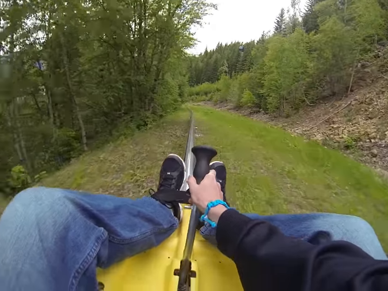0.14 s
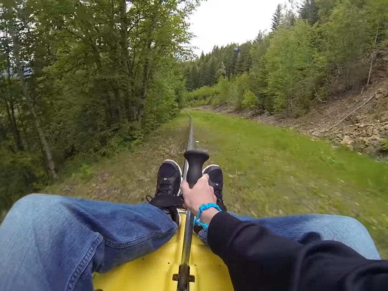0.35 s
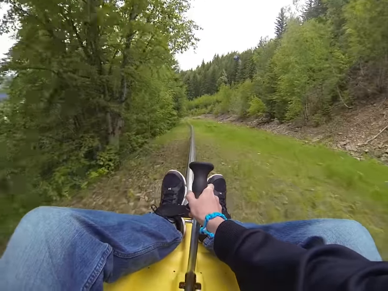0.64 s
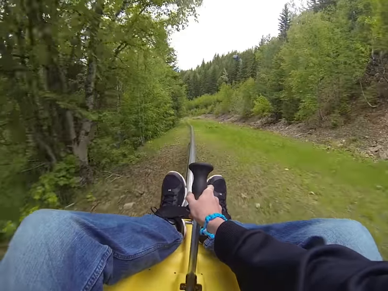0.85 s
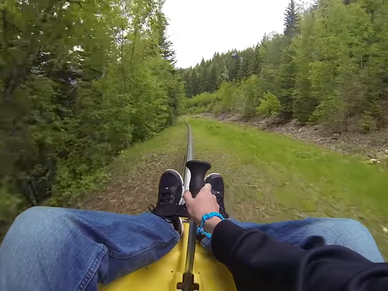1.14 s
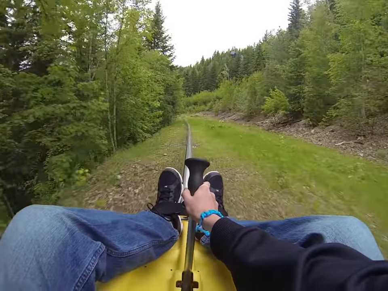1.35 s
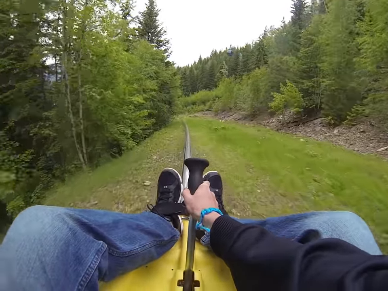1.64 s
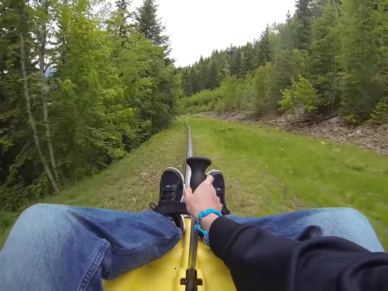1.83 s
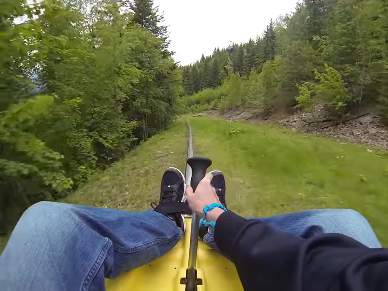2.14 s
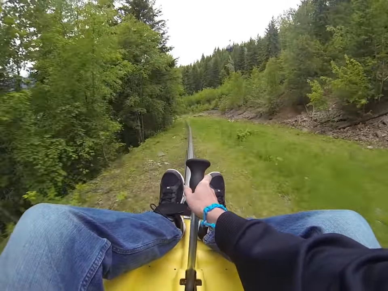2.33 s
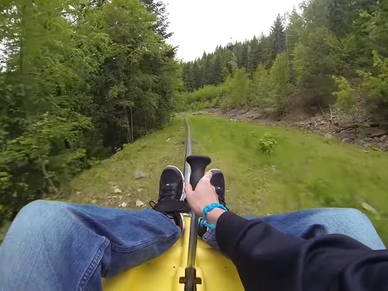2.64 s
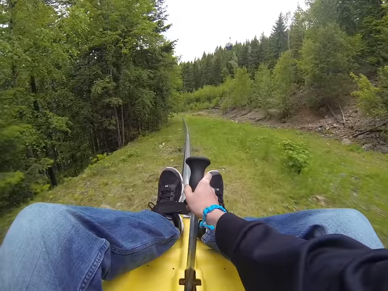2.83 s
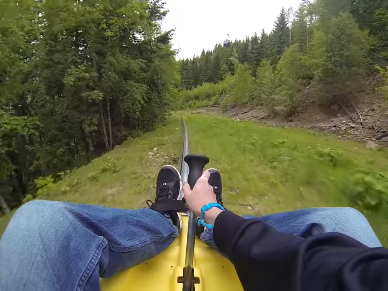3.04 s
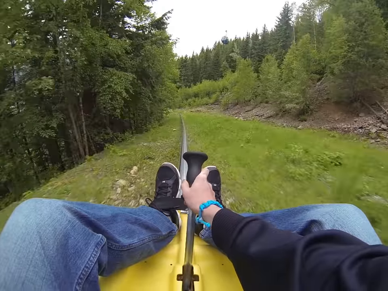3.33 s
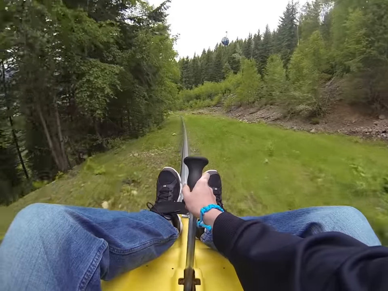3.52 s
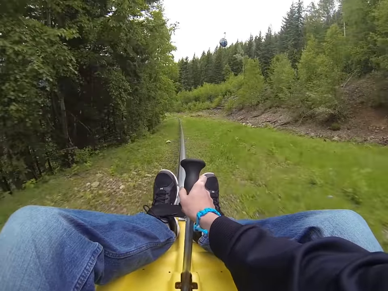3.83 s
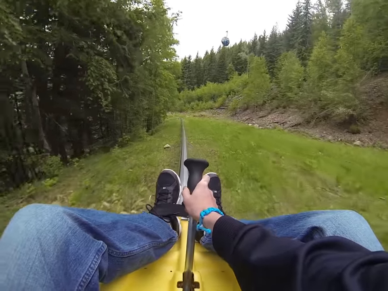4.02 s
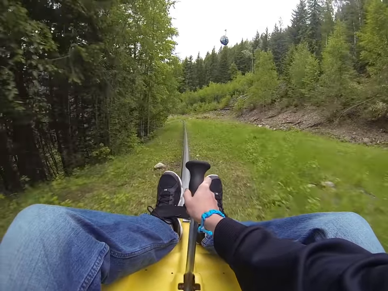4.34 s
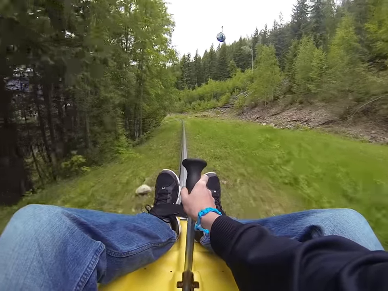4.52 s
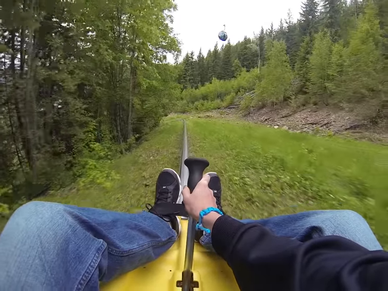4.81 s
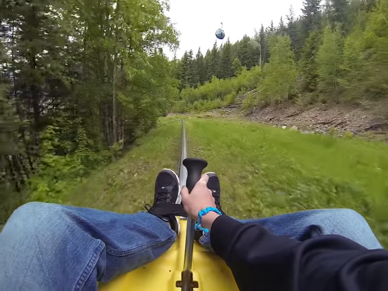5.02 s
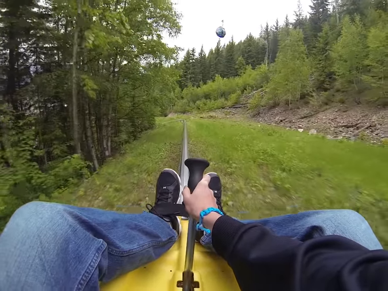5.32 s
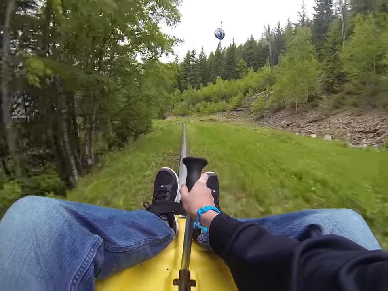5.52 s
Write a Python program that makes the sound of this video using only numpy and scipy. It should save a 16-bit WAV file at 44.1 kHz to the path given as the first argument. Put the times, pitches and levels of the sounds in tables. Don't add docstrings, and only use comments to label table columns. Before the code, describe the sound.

A sled rolls quickly and at nearly constant speed down a metal rail outdoors, heard through a small camera on the rider that picks up vibration more than air. A deep, fluttering rumble dominates, throbbing about twenty-six times a second, with irregular heavy lurches of very low bass and a dull, gritty metallic ring. The first 0.3 seconds are roughest, with a burst of knocks and rattles. A very faint brake graze sings around 0.2 and again near 1.4-1.6 seconds beside a small rough patch. Sparse ticks follow from 2 to 3.3 seconds, then a sudden rough rattle and knock at 3.4-3.5. Loose parts chatter in a quick run of clicks at 4.05-4.25, again at 4.8-4.9, and a few clicks and thumps come near 5.4-5.5 before a last jolt at the end. Thin hiss and a barely audible high whine lie beneath.

```python
import sys
import numpy as np
from scipy import signal
from scipy.fft import rfft, irfft
from scipy.io import wavfile
from scipy.ndimage import uniform_filter1d

SR = 44100
rng = np.random.default_rng(int(sys.argv[2]) if len(sys.argv) > 2 else 0)


def generate_wav(signal):
    frames = np.transpose(np.atleast_2d(signal))
    scaled = np.clip(frames, -1, 1) * 32767
    pcm = np.round(scaled).astype(np.int16)
    wavfile.write(sys.argv[1], SR, pcm)


def amplitude_ratio(level_db):
    exponent = np.asarray(level_db, float) / 20
    return 10 ** exponent


N = 250047

# (time [s], speed [turns per s])
WHEEL_SPEED = [
    (0, 26.55),
    (1.2, 26.5),
    (1.8, 26.2),
    (5.67, 26.25),
]
# (time [s], wobble [dB], wobble fade [dB per s], sway [dB], shudder [dB])
JOLTS = [(.03, -22, 153, -23, -25.5), (.15, -46, 100, -12, -17), (.38, -18, 133, -17.5, -33),
         (.61, -24, 49, -34, -37), (.9, -20.5, 20, -32, -22.5), (1.29, -39, 60, -28, -29),
         (1.53, -25.5, 83, -20, -31.5), (1.8, -23.5, 90, -37, -42), (2.14, -23.5, 58, -35, -37),
         (2.29, -45, 20, -19, -49), (2.45, -28, 4, -46, -56), (2.8, -23.5, 16, -19.5, -26),
         (3.34, -27, 60, -24.5, -47), (3.45, -20.5, 61, -41, -29.5), (3.55, -31, 200, -22.5, -30),
         (3.67, -20.5, 70, -37, -30.5), (3.97, -25, 10, -32, -46), (4.19, -18.5, 36, -19, -22),
         (4.85, -17.5, 54, -24, -23.5), (5.37, -24.5, 68, -31, -31), (5.502, -13, 170, -13, -23.5),
         (5.67, -27, 50, -24, -36)]
SWAY_RISE, SWAY_FALL, SWAY_REST_DB = 156, 91, -36
SHUDDER_RISE, SHUDDER_FALL, SHUDDER_REST_DB = 120, 92, -42
# (multiple of the turn [count], level [dB rms])
TREAD_BUMPS = [(2, -57), (3, -50), (4, -52.5), (5, -52.5), (7, -56.5), (10, -55), (11, -54.5), (12, -58.5),
               (15, -57.5), (16, -62), (19, -66.5), (22, -65.5), (23, -66.5)]
# (frequency [Hz], level [dB per Hz])
RUMBLE_TONE = [(35, -33), (60, -3.5), (76, -5), (188, -16.5), (287, -20.5), (351, -24), (465, -24.5),
               (650, -29.5), (760, -26.5), (858, -37), (1000, -33.5), (1300, -54), (2200, -120)]
# (frequency [Hz], width [Hz], level [dB])
SHELL_RINGS = [(1281, 205, 8.5), (1520, 650, -1), (2196, 380, -0.5), (2893, 446, -5), (3033, 150, -15.5),
               (3800, 240, -22), (4364, 350, -19), (5000, 480, -21), (5470, 250, -33), (6340, 500, -39),
               (7720, 770, -25), (9700, 540, -24.5)]
# (time [s], rumble [dB], ring [dB], rise [dB per s], fall [dB per s])
ROUGH_RAIL = [
    (.11, -36, -46.5, 100, 51),
    (.28, -54, -52.5, 60, 47),
    (1.45, -43, -53, 31, 40),
    (3.41, -45, -51.5, 309, 122),
    (3.52, -44, -51, 200, 103),
]
# (time [s], level [dB], rise [dB per s], fall [dB per s])
PAD_TOUCHES = [
    (.2, -71, 5, 98),
    (1.42, -66.5, 68, 63),
    (1.6, -77.5, 30, 8),
]
# (time [s], peak [dB], bright edge [dB])
LATCH_CLICKS = [(.0677, -33, -58), (.1466, -39, -67), (1.4403, -37, -62), (2.0933, -34, -55),
                (2.8026, -45, -64), (2.8828, -42, -75), (3.4434, -32.5, -57), (4.0494, -42, -57),
                (4.096, -41, -63), (4.1339, -29.5, -53.5), (4.1677, -31.5, -48), (4.2047, -30, -50.5),
                (4.244, -36, -52.5), (4.785, -33, -55), (4.8198, -31.5, -55.5), (4.857, -29.5, -56),
                (4.872, -47, -53.5), (4.8935, -33.5, -55), (5.392, -47, -65)]
# (time [s], peak [dB], bright edge [dB])
FLAP_CLICKS = [(.1977, -29, -69), (.209, -36, -75), (.6972, -41, -74), (.786, -40, -75), (1.2468, -45, -57),
               (1.5378, -41, -70), (3.0243, -38, -61), (3.2303, -31.5, -49.5), (4.932, -45, -69),
               (5.001, -45, -57.5), (5.5186, -38, -52)]
# (time [s], peak [dB], bright edge [dB])
PIN_CLICKS = [(.0886, -45, -55), (.5124, -44.5, -67), (1.3, -54, -69), (1.6324, -54, -58.5),
              (2.5087, -47, -67), (2.6526, -55, -63), (2.72, -44, -62), (2.7545, -42, -53),
              (2.8633, -46, -61), (2.9976, -40.5, -60), (3.18, -43.5, -78), (3.2303, -38.5, -75),
              (3.4434, -39.5, -66), (5.4367, -41, -57), (5.47, -51, -63), (5.5089, -37, -53)]
# 2 kHz ring [dB], low ring [dB], upper ring [dB]
LATCH_COLOUR, FLAP_COLOUR, PIN_COLOUR = (0, -11, -17.5), (-6, 0, -14), (1, 0, 0)
# (frequency [Hz], width [Hz], level [dB])
CLICK_RINGS = [
    [(2075, 326, 0), (2258, 390, -1)],
    [(1318, 250, 1.5), (1486, 370, -9)],
    [(2797, 280, 0.0), (2950, 480, -5.0)],
    [(4190, 206, 1.5), (5160, 196, -2.5), (6420, 150, -8.5),
     (7270, 1400, -11.5), (9100, 560, -19), (11800, 2400, -22.5)]]
# (time [s], level [dB], frequency [Hz])
FLOOR_KNOCKS = [(.085, -31, 220), (.123, -25.5, 109), (.131, -24, 109), (.197, -20.5, 130),
                (.208, -21, 126), (.228, -23.5, 118), (0.617, -38, 116), (1.22, -29, 121),
                (2.761, -29.5, 121), (3.176, -34, 129), (3.23, -27.5, 123), (3.389, -29, 149),
                (3.442, -21.5, 134), (4.142, -32, 122), (4.995, -28.5, 110), (5.426, -33, 125),
                (5.508, -27, 142)]
# (time [s], level [dB], frequency [Hz], slap [dB])
SEAT_KNOCKS = [(0.086, -24, 277, -41), (0.124, -35, 228, -50), (.154, -32, 247, -38),
               (.197, -25.5, 214, -28.5), (.208, -28.5, 376, -31), (.23, -33, 283, -51),
               (.616, -40, 250, -54), (1.439, -49, 262, -39.5), (1.549, -36, 212, -43),
               (2.089, -34.5, 316, -38.5), (2.761, -36, 320, -48), (2.869, -36, 237, -61),
               (3.02, -35, 221, -41), (3.23, -38, 220, -58), (3.384, -30.5, 224, -48),
               (3.441, -42, 288, -51), (3.497, -33, 273, -45), (4.049, -31.5, 383, -39.5),
               (4.142, -37, 237, -38), (4.163, -26.5, 289, -48), (5.425, -37.5, 303, -55),
               (5.507, -32, 290, -36)]
# (frequency [Hz], level [dB per Hz])
HISS_TONE = [(2500, -17), (4000, 3), (8000, -1), (12000, -3.5), (14300, -2.5), (15200, -6), (15400, -42)]


def unit(x):
    return x / np.sqrt(np.mean(x ** 2))


def band(x, hz, width):
    return signal.lfilter(*signal.iirpeak(hz, hz / width, fs=SR), x)


def triple_band(x, hz, width):
    for _ in range(3):
        x = band(x, hz, width)
    return x


def steep(lo_hz, hi_hz):
    sos = signal.butter(2, [lo_hz, hi_hz], "bandpass", fs=SR, output="sos")
    return unit(signal.sosfilt(sos, rng.standard_normal(N + SR))[SR:])


def coloured(tone):
    hz, db = np.transpose(tone)
    f = np.maximum(np.arange(N // 2 + 1) * SR / N, 1)
    gain = amplitude_ratio(np.interp(np.log(f), np.log(hz), db))
    return unit(irfft(rfft(rng.standard_normal(N)) * gain, N))


def walk(rate):
    hold = int(SR / rate)
    steps = np.repeat(rng.standard_normal(N // hold + 1), hold)
    return unit(uniform_filter1d(uniform_filter1d(steps, hold), hold)[:N])


def even(x, seconds):
    return unit(x / np.sqrt(uniform_filter1d(x ** 2, int(seconds * SR)) + 1e-9))


def swells(rows, rest_db):
    t = np.arange(0, N, 64) / SR
    power = amplitude_ratio(2 * rest_db)
    for s, db, rise, fall in rows:
        loss_db = np.where(t < s, rise * (s - t), fall * (t - s))
        power = power + amplitude_ratio(2 * (db - loss_db))
    return np.interp(np.arange(N) / SR, t, 10 * np.log10(power))


def wheel_turn():
    s, speed = np.transpose(WHEEL_SPEED)
    return .05 + np.cumsum(np.interp(np.arange(N) / SR, s, speed)) / SR


def shake(turn):
    wobble_db = swells([(s, db, 196, fade) for s, db, fade, _, _ in JOLTS], -33)
    sway_db = swells([(s, db, SWAY_RISE, SWAY_FALL) for s, _, _, db, _ in JOLTS], SWAY_REST_DB)
    shudder_db = swells([(s, db, SHUDDER_RISE, SHUDDER_FALL) for s, _, _, _, db in JOLTS], SHUDDER_REST_DB)
    wobble = np.sqrt(2) * np.cos(2 * np.pi * (turn + 0.34 + 0.098 * walk(4)))
    wobble = wobble * amplitude_ratio(wobble_db + 1.56 * walk(10))
    sway = amplitude_ratio(sway_db) * even(steep(6.16, 15.05), .15)
    shudder = amplitude_ratio(shudder_db) * even(steep(31.0, 46.9), 0.14)
    return np.tanh(1.245 * (wobble + sway + shudder)) / 1.33


def tread(turn):
    levels = {k: -61 - 7 * np.log2(k / 8) for k in range(6, 27)}
    levels.update(dict(TREAD_BUMPS))
    out = np.zeros(N)
    for k, db in levels.items():
        phase = k * turn + 0.067 * walk(5) + rng.random()
        out += amplitude_ratio(db + 2 * walk(1.473)) * np.sqrt(2) * np.cos(2 * np.pi * phase)
    return out


def rail(rest_db, per_shudder_db, column):
    patches = [(row[0], row[column], *row[3:]) for row in ROUGH_RAIL]
    shudders = [(row[0], row[-1] + per_shudder_db, SHUDDER_RISE, SHUDDER_FALL) for row in JOLTS]
    return swells(patches + shudders, rest_db)


def rolling(turn):
    rumble_db = rail(-42, -22, column=1)
    ring_db = rail(-53, -33, column=2)
    rumble = coloured(RUMBLE_TONE) * amplitude_ratio(rumble_db + 1.52 * walk(25.03))
    from_flat = (turn + .5) % 1 - .5
    flat = np.exp(-from_flat ** 2 / 0.08 ** 2) * amplitude_ratio(1.5 * walk(18))
    swell_db = 1.03 * walk(12)
    ring = np.zeros(N)
    for hz, width, db in SHELL_RINGS:
        sharpness = 1.08 * min(hz / 3000, 1) ** 2 + 2.5 * np.exp(-((hz - 4300) / 400) ** 2)
        grit = rng.standard_normal(N) * (1 + sharpness * flat)
        grit = grit * amplitude_ratio(swell_db + 0.88 * walk(15))
        ring += amplitude_ratio(db) * triple_band(grit, hz, 1.94 * width)
    return rumble + amplitude_ratio(ring_db) * unit(ring)


def pad():
    def ring(hz, width):
        return unit(band(band(rng.standard_normal(N), hz, width), hz, width))

    haze = ring(6330, 300) + ring(6970, 250) + ring(7720, 300)
    song = ring(4975, 190) + amplitude_ratio(-1) * ring(3820, 260) + amplitude_ratio(-10) * haze
    return amplitude_ratio(swells(PAD_TOUCHES, -89.5) + 2.5 * walk(29.5)) * song


def clicks():
    out, t = np.zeros(N + 4000), np.arange(4000) / SR
    u = t / 0.0011
    shape = u * np.exp(1 - u) + amplitude_ratio(-6.5) * np.exp(-t / 0.0087) * np.minimum(u, 1)
    crests_db = (0.65, 4.97, 5.1, 5.9)
    parts = (LATCH_CLICKS, LATCH_COLOUR), (FLAP_CLICKS, FLAP_COLOUR), (PIN_CLICKS, PIN_COLOUR)
    for rows, colour in parts:
        for s, peak_db, edge_db in rows:
            levels_db = [*(peak_db + np.array(colour)), edge_db]
            push = rng.standard_normal(len(t)) * shape
            start = int((s - .0006) * SR)
            for modes, db, crest_db in zip(CLICK_RINGS, levels_db, crests_db):
                ring = sum(amplitude_ratio(mode_db) * triple_band(push, hz, 2.17 * width) for hz, width, mode_db in modes)
                out[start:][:len(t)] += amplitude_ratio(db + crest_db) * ring / np.max(np.abs(ring))
    return out[:N]


def knocks():
    out, t = np.zeros(N + 4000), np.arange(4000) / SR
    # time [s], level [dB], frequency [Hz], length [cycles]
    floor = [(s, db, hz, 1.3) for s, db, hz in FLOOR_KNOCKS]
    seat = [(s, db, hz, 3.5) for s, db, hz, _ in SEAT_KNOCKS]
    slaps = [(s, slap_db - 0.5, 600, 1.6) for s, _, _, slap_db in SEAT_KNOCKS]
    for s, db, hz, cycles in floor + seat + slaps:
        shape = np.minimum(t / 0.0035, 1) * np.exp(-t * hz / cycles)
        ring = np.sin(2 * np.pi * hz * t) * shape
        out[int(s * SR):][:len(t)] += amplitude_ratio(db - 1.5) * ring / np.max(np.abs(ring))
    return out[:N]


def camera():
    t = np.arange(N) / SR
    frame = 47.965 * t + .075
    chance = rng.random((int(frame[-1]) + 1, 2))
    phase, lift = chance[frame.astype(int)].T
    busy = uniform_filter1d(1. * (frame % 1 < .37), 40)
    whine = busy * amplitude_ratio(-69 + 3 * lift) * np.sin(2 * np.pi * (12885 * t + phase))
    return whine + amplitude_ratio(-70.5) * coloured(HISS_TONE)


def scene():
    turn = wheel_turn()
    mix = shake(turn) + tread(turn) + rolling(turn) + pad() + clicks() + knocks() + camera()
    return mix[None]


def low_pass(x):
    return signal.sosfilt(signal.butter(12, 15180, fs=SR, output="sos"), x)


def record(dry):
    return low_pass(dry)


dry = scene()
out = record(dry)
generate_wav(out)
```